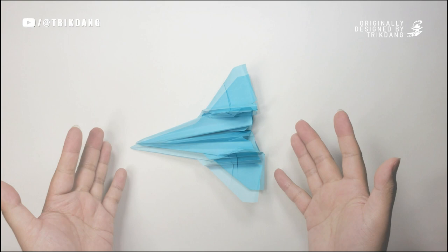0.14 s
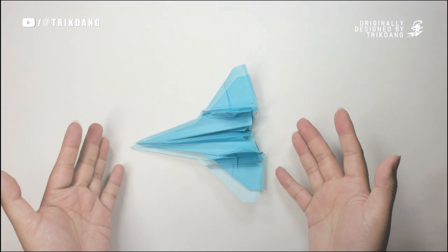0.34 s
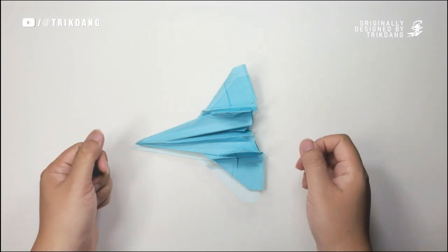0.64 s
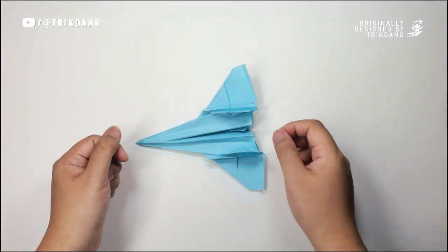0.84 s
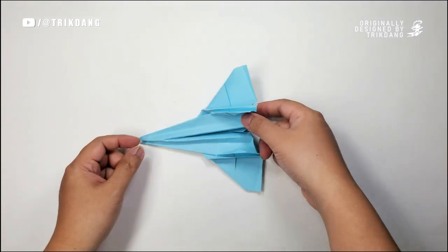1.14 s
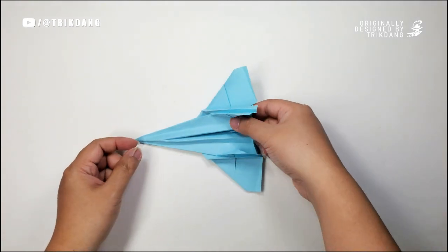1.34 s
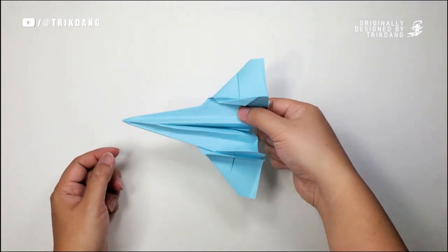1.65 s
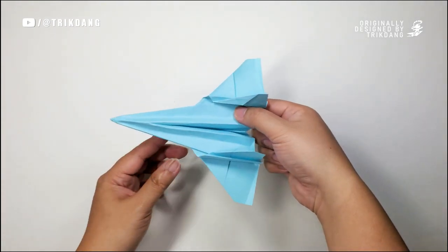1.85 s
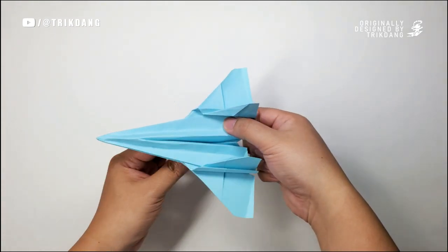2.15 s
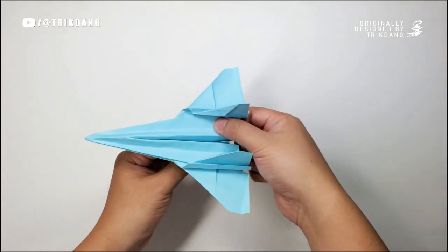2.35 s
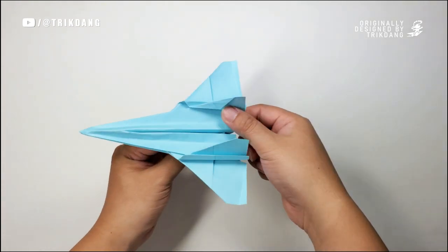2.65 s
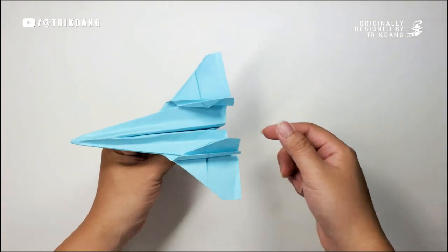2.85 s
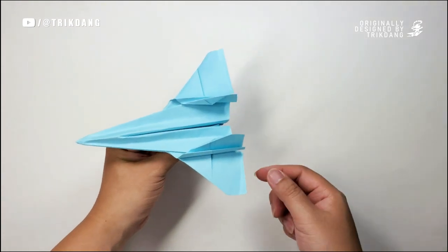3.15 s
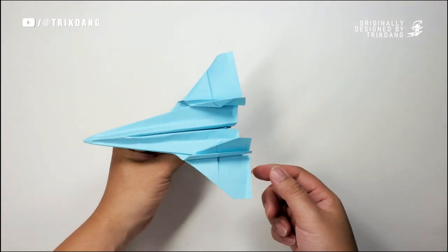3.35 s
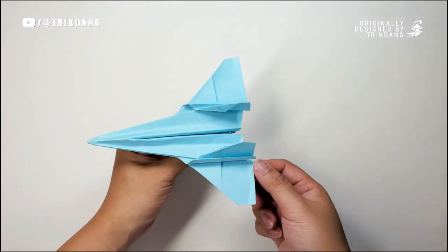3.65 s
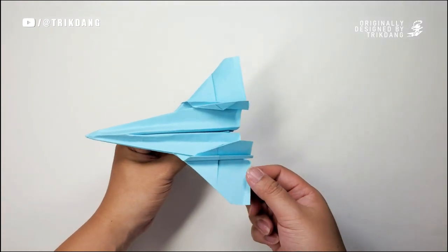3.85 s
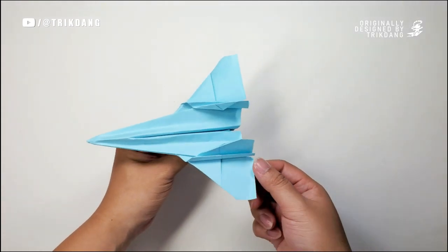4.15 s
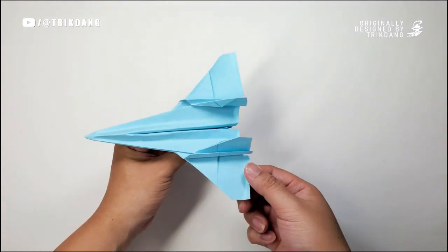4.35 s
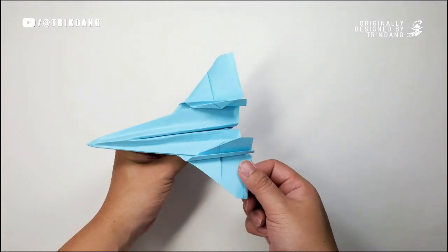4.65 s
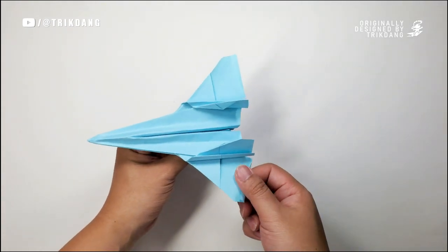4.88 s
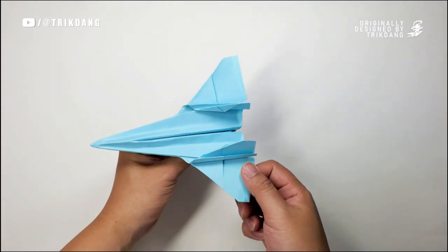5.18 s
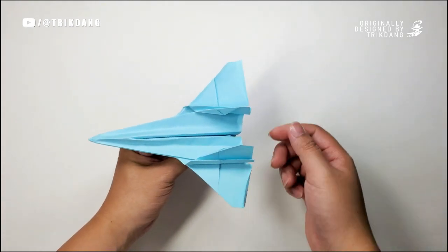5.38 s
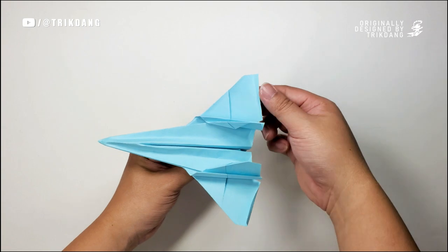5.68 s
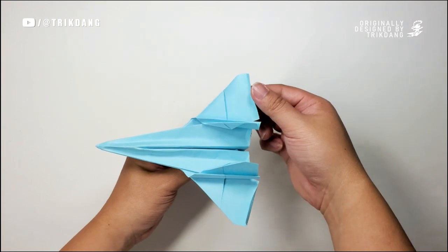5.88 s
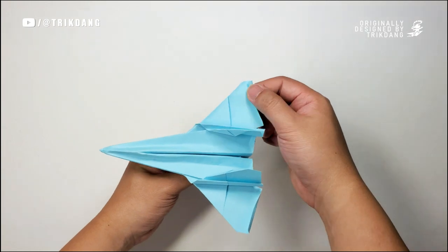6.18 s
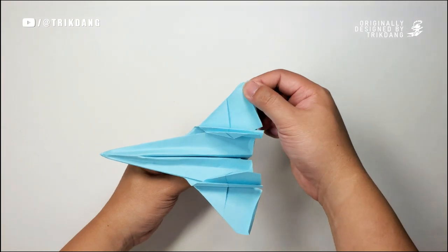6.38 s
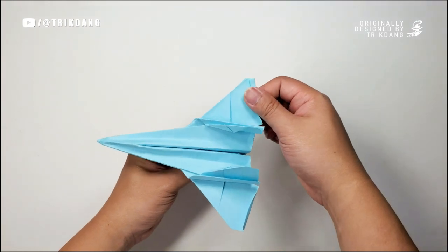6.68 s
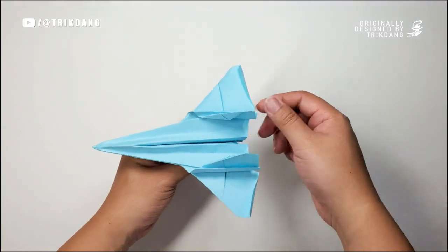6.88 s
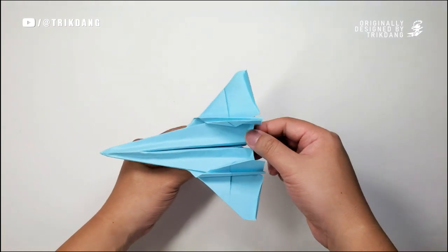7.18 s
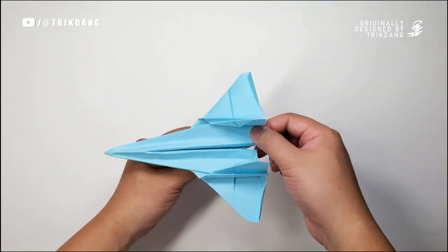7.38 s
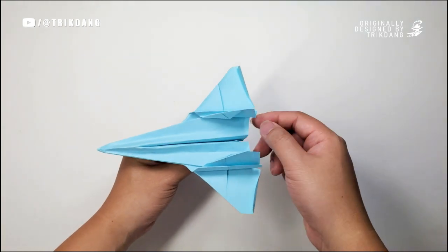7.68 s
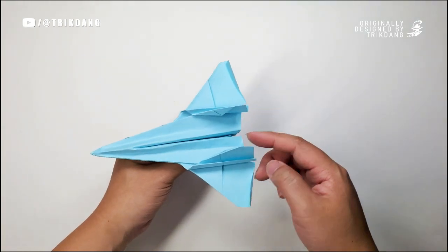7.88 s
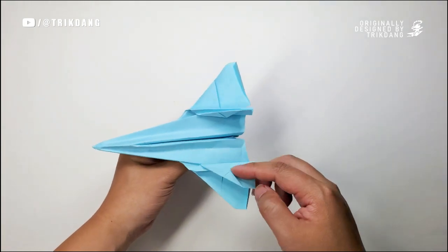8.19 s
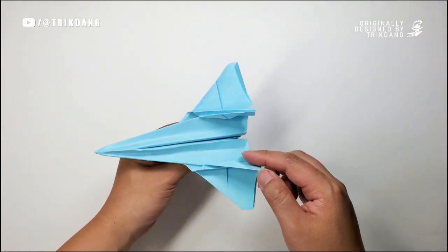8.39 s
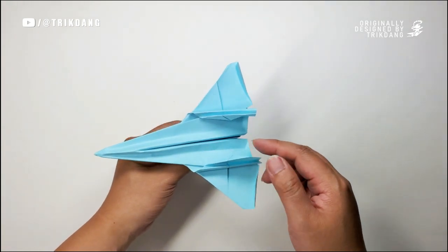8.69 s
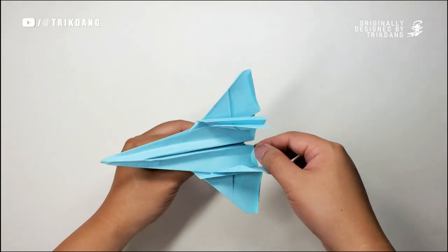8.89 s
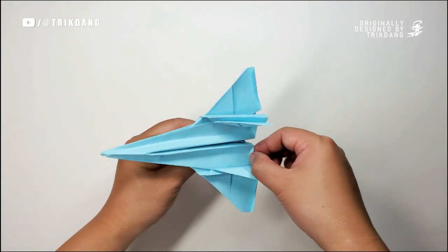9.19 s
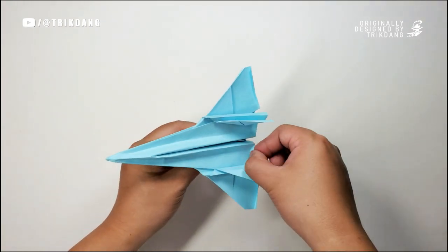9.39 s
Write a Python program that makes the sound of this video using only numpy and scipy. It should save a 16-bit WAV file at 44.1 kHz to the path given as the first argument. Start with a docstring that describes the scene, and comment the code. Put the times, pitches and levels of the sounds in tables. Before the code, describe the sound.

A stiff folded paper model is lifted and adjusted by fingertips over a table. A single bright snap near the beginning towers over everything else; afterwards there are airy rubbing strokes, crisp crinkles, small ticks and occasional dull panel pops, separated by short pauses. Beneath lies a constant deep hum with faint overtones and air noise. The microphone is near, the room small and fairly dry.

```python
"""A room with a table: fingertips slide along the folds of a paper model held above the top.
Stick-slip clicks drive resonances of the sheet; creases snap as short rings with cracks, panels pop lower.
The table top and the room return the paper's sound. A small motor hums as a comb of sine overtones
over ventilation noise, shaped by frequency. The sound fades up at first."""
import sys
import numpy as np
from scipy import signal
from scipy.fft import rfft, irfft, next_fast_len
from scipy.io import wavfile
from scipy.ndimage import uniform_filter1d

SR = 44100
rng = np.random.default_rng(int(sys.argv[2]) if len(sys.argv) > 2 else 0)


def store_pcm(level_fs):
    """Save levels as 16-bit WAV."""
    pcm = np.round(np.clip(level_fs, -1, 1) * 32767).astype(np.int16)
    wavfile.write(sys.argv[1], SR, np.atleast_2d(pcm).T)


N = 420273

# sheet resonances: f/Hz, width of one stage/Hz, relative level/dB
POCKET_MODES = [(2100, 820, -3), (2719, 373, 0), (3330, 1200, -8.5), (4154, 880, -4.5)]
HISS_MODES = [(4650, 1300, -0.5), (5860, 920, -1.5), (6410, 1300, -2), (7750, 1500, 1.5), (9204, 1500, -8)]
SHEEN_MODES = [(10410, 2900, 5), (13550, 8200, -0.5), (17300, 1400, 3.5)]
FLEX_MODES = [(640, 164.3, 10), (760, 181, -2), (1170, 340, 4), (1451, 364, -4)]
# creases snapping: t/s, peak before room/dB, ring f/Hz, crack above ring/dB, crack tilt/(dB/octave), left-right/dB
SNAP_EVENTS = [(1.267, -46.5, 1960, -18, -11, 4), (1.634, -54, 2700, 2, -7, -9),
               (1.6662, -15, 2370, -7, -4.5, 0), (2.215, -55, 2670, 1.5, -1, -2),
               (2.611, -41.5, 2500, -6.5, -10, 1), (2.798, -60, 2820, -4, -11, -5),
               (3.036, -59.5, 2950, -8, -16, -3), (3.8745, -63, 2250, -8, -15, 0),
               (3.886, -61, 2370, 10, -2, -11), (4.245, -51.5, 2330, 1.5, -10, 1),
               (4.483, -50, 4300, 3, -3, -9), (4.512, -62, 2600, 12, -2, -6),
               (4.5224, -56, 2100, -1, -4, -2), (4.538, -61, 2200, 20, 2, -2),
               (4.579, -67, 2700, 16, -4, -4), (4.854, -65, 2440, 9, 0, 0),
               (5.022, -47, 2950, 8.5, -11, -1), (5.0535, -61.5, 2530, 13.5, -2, -1),
               (5.4225, -50, 3200, -4, -2, -1), (5.4322, -33.5, 2555, -6.5, -9, -1),
               (6.0982, -39, 4030, 0.5, -16, -2), (6.147, -56, 2850, -7, -11, -4),
               (6.1822, -42, 4130, 0, -20, -1), (6.4856, -56, 2880, 5, -21, -1),
               (6.6042, -42, 4150, 1.5, -21, -2), (6.742, -52, 2900, -10, -11, 0),
               (6.981, -52, 2550, -10, -12, 2), (7.0402, -58.5, 2420, 3, -12, 2),
               (7.17, -52, 2970, 7.5, -18.5, -2), (7.354, -46, 2450, -1.5, -16, 5),
               (7.898, -47, 2900, 1, -10.5, -1), (7.9254, -48, 3020, 5, -15, 2),
               (8.209, -56, 2100, -5, -16, -1), (8.4636, -31.5, 3620, 4, -14, -3),
               (9.315, -53, 3700, 5.5, -20.5, 0), (9.443, -59, 2500, -8, -12, 6)]


def from_db(db):
    """Decibels to gain."""
    return 10 ** (np.asarray(db) / 20)


def rms_one(x):
    """Scale to rms 1."""
    return x / np.sqrt(np.mean(x ** 2) + 1e-20)


def at_hz(points, hz):
    """Read a spectrum on a log-frequency axis."""
    point_hz, values = np.array(points).T
    return np.interp(np.log(hz), np.log(point_hz), values)


def sides(pan_db):
    """Left and right gains of constant power."""
    gains = from_db(np.array([[.5], [-.5]]) * pan_db)
    return gains / np.sqrt(np.mean(gains ** 2, axis=0))


def wobble(spread_db, corner_hz):
    """Slowly wandering gain: noise at every 100th sample through a double one-pole low-pass, read as dB."""
    r = np.exp(-200 * np.pi * corner_hz / SR)
    noise = rng.standard_normal(N // 100 + 402)
    slow = signal.lfilter([1], [1, -2 * r, r * r], noise)[400:]     # drop the filter's start
    return np.interp(np.arange(N) / 100, np.arange(len(slow)), from_db(spread_db * rms_one(slow)))


def resonate(x, modes, patchy_db=0, centre_hz=None):
    """Parallel two-stage resonances of alternating sign, optionally swelling or favouring a centre; rms 1."""
    favour_db_per_octave2 = 16.5
    out, total = 0, 0
    for k, (hz, width_hz, level_db) in enumerate(modes):
        r = np.exp(-np.pi * width_hz / SR)
        stage = [(1 - r * r) / 2, 0, (r * r - 1) / 2, 1, -2 * r * np.cos(2 * np.pi * hz / SR), r * r]
        swell = wobble(patchy_db, corner_hz=13.6) if patchy_db else 1
        drop_db = 0 if centre_hz is None else favour_db_per_octave2 * np.log2(hz / centre_hz) ** 2
        gain = from_db(level_db - drop_db)
        ringing = signal.sosfilt([stage, stage], x + 1e-18)
        out = out + (-1) ** k * gain * swell * ringing
        total = total + width_hz * gain ** 2
    return rms_one(out / np.sqrt(total))


def motor():
    """Overtones of the shaft rate, high ones wavering more; standing waves give each its side and lead."""
    shaft_hz = 58.865
    # multiple of shaft rate, rms before fade/dB, left-right/dB, left lead/rad
    overtones = [(1, -49.9, -2.4, -0.3), (2, -82, 0, -0.1), (3, -88, -2, -0.6), (5, -80, -1, -0.5),
                 (6, -84, 0, -0.5), (10, -78, 4, 2.6), (11, -87, -5, -1.6), (13, -94, -6, 2.8),
                 (14, -95, 1, 3.1), (22, -92, -1, -2.9), (23, -83, 0, 2.6), (24, -86, 3, -2.6),
                 (32, -95, -7, -1.7), (33, -92, -3, 2.0), (34, -94, -11, 1.9), (38, -90, 0, -2.8),
                 (39, -85, 7, -3.0), (40, -82, -11, -3.1), (41, -91, -1, 0.7), (42, -87, 2, -0.5),
                 (45, -87, -16, -0.8), (46, -83, 4, 2.8), (48, -91, -5, -0.0), (51, -92, -3, -0.3),
                 (52, -95, -7, -1.1), (53, -94, -6, 1.9), (78, -94, -9, -2.5)]
    turn, out = 2 * np.pi * shaft_hz * np.arange(N) / SR, np.zeros((2, N))
    for multiple, level_db, pan_db, lead_rad in overtones:
        phase = multiple * turn + rng.uniform(0, 2 * np.pi) + np.array([[lead_rad], [0]])
        waver = wobble(0.081 + .5 * np.log(multiple), corner_hz=3.8)
        out += np.sqrt(2) * from_db(level_db) * waver * sides(pan_db) * np.sin(phase)
    return out


def air():
    """Ventilation noise with resonances, its likeness and lean between the ears set per frequency."""
    level_db, rumble_hz = -65.5, 250
    # noise spectrum: f/Hz, relative density/dB
    spectrum = [(30, -28), (72, -26.5), (100, -24.5), (174, -38), (330, -38), (420, -42.5), (610, -44),
                (900, -47), (1350, -55), (1700, -54), (2550, -50), (4200, -56), (8500, -67), (15500, -59)]
    # left-right likeness: f/Hz, correlation (-1 to 1)
    likeness = [(60, 0.72), (150, 0.934), (380, 0.025), (950, -0.44), (2380, -0.25), (5980, -0.12),
                (15000, -0.065)]
    # side balance: f/Hz, left-right/dB
    lean = [(60, -2), (150, 1), (380, 1.5), (950, 0.0), (2380, -1.5), (5980, -2.5), (15000, 3)]
    # motor housing and ducts ringing: f/Hz, width/Hz, rise above noise/dB
    housing = [(127.5, 6.8, 10.5), (204, 25, 3), (600, 39, 8.5), (1340, 220, 12.5), (1960, 120, 3.5),
               (2370, 98, 6.5), (2950, 58, 6), (4070, 80, 8), (4405, 106.2, 10), (5430, 200, 9),
               (7670, 142, 9)]
    # gain of the low end: t/s, gain/dB
    rumble = [(0, 0.5), (1.198, 2), (2.401, -1.5), (3.5, -4), (5.5, -5.5), (9.53, -4.5)]
    size = next_fast_len(N)
    hz = np.maximum(np.arange(size // 2 + 1) * SR / size, 20)
    mid, side = rfft(rng.standard_normal((2, size)))
    alike = np.clip(at_hz(likeness, hz), -1, 1)
    pair = np.sqrt(1 + alike) * mid + np.sqrt(1 - alike) * side * [[1], [-1]]
    peaks_db = sum(rise_db / (1 + (2 * (hz - peak_hz) / width_hz) ** 2)
                   for peak_hz, width_hz, rise_db in housing)
    pair = pair * from_db(at_hz(spectrum, hz) + peaks_db) * sides(at_hz(lean, hz))
    full = irfft(pair, size)[:, :N]
    low = irfft(pair / (1 + (hz / rumble_hz) ** 4), size)[:, :N]
    extra = from_db(np.interp(np.arange(N) / SR, *np.transpose(rumble))) - 1
    return from_db(level_db) * rms_one(full + extra * low)


def pressure():
    """Gains of hiss, pocket, flex, sheen and centres of pocket, hiss, sheen.

    Each stroke rises, holds and falls; after each snap the settling sheet leaves a dying rustle."""
    # finger strokes: full pressure t/s, rise/s, hold/s, fall/s (rise and fall per 20 dB), hiss before room/dB,
    # pocket, flex, sheen above hiss/dB, centres of pocket, hiss, sheen f/Hz
    finger_strokes = [(0.77, 0.057, 0.05, 0.1, -86, 0, 6.5, 0, 2510, 6220.0, 14500.0),
                      (1.27, 0.029, 0.032, 0.04, -83.5, 14.5, 3.0, 1, 2117, 5650, 12800.0),
                      (1.334, 0.03, 0.039, 0.07, -70, 1.5, -8, -8, 2675, 5520, 14200),
                      (1.525, 0.016, 0.03, 0.094, -76.5, 1.5, -10, 0, 2760.0, 5750, 13150),
                      (1.636, 0.045, 0.034, 0.026, -62.5, 3.5, -8, -5.5, 3070.0, 5470, 13250),
                      (1.76, 0.11, 0.036, 0.19, -77.5, 3, -5, -3, 2430, 6180.0, 13060),
                      (1.96, 0.077, 0.016, 0.028, -71.5, -6, -9, -10, 2990.0, 6260, 12600.0),
                      (2.218, 0.0045, 0.031, 0.074, -72.5, -4, -8, -10, 2730, 6140.0, 12600.0),
                      (2.42, 0.16, 0.076, 0.1, -65, 0, -8.5, -7, 2720, 6500, 11900.0),
                      (2.53, 0.06, 0.065, 0.025, -67, 3, -7, -5, 2830, 5810, 14130),
                      (2.685, 0.033, 0.027, 0.094, -70.5, 2.5, -5.0, -8, 3685, 4850, 13290),
                      (2.825, 0.054, 0.045, 0.08, -61, -1, -13, -4.5, 2820, 5020, 14000.0),
                      (2.9, 0.057, 0.038, 0.037, -64, -1.5, -23, 1.5, 3300, 5770, 13650),
                      (2.95, 0.034, 0.018, 0.03, -62.5, -0.5, -6, -13, 3480.0, 5060, 13900.0),
                      (3.04, 0.03, 0.05, 0.099, -85, 5.5, 3, -15, 2944, 4970.0, 14500.0),
                      (3.82, 0.02, 0.073, 0.027, -73, -10, -22, -12, 2150.0, 6500.0, 10800.0),
                      (3.958, 0.011, 0.073, 0.09, -59, -6.5, -14.5, -2.5, 3200, 7130, 12120),
                      (4.11, 0.069, 0.044, 0.044, -64, -3.5, -15.5, -8.0, 2600, 7650, 11010),
                      (4.25, 0.01, 0.08, 0.034, -83.0, -4, -3, 1.5, 2200, 6450, 13100.0),
                      (4.478, 0.011, 0.026, 0.02, -53, -7.5, -18.5, -5, 3770, 8100, 10820),
                      (4.522, 0.007, 0.008, 0.012, -53, -12, -24, -7, 2600, 7000, 10800.0),
                      (4.58, 0.028, 0.017, 0.044, -72, -16, -13, -4, 3400.0, 7000, 11300.0),
                      (4.665, 0.1, 0.027, 0.078, -68.5, -4, -25, -4, 2998, 7100, 11700.0),
                      (4.779, 0.054, 0.013, 0.03, -72, -9, -25, -7.5, 3910.0, 5840, 12300.0),
                      (4.855, 0.0096, 0.0081, 0.033, -69, -5, -14, 0, 3690.0, 6680.0, 10390),
                      (4.92, 0.11, 0.043, 0.032, -70, -9, -16, -3.5, 3660, 6750, 11510),
                      (5.0, 0.022, 0.021, 0.03, -64.5, -6, -19, -9, 3720, 7510.0, 11200.0),
                      (5.235, 0.012, 0.013, 0.076, -70, -2, -16, -1, 2670, 7180, 11000.0),
                      (5.414, 0.01, 0.018, 0.042, -59, -10, -15, -2.5, 3270, 6770, 12130),
                      (6.146, 0.0069, 0.037, 0.055, -68, -2, -7.5, -6, 3036, 6740.0, 12900.0),
                      (6.392, 0.016, 0.042, 0.039, -58.5, -3.0, -11, 2, 2910, 7200, 13050),
                      (6.689, 0.03, 0.035, 0.063, -60.5, -7.5, -17, -3.0, 3440.0, 7430, 12300.0),
                      (6.775, 0.04, 0.028, 0.025, -65, -6.5, -26, -4, 2702, 7240, 12300.0),
                      (6.955, 0.013, 0.028, 0.024, -67.5, -3, -12.0, -2.5, 2586, 7300.0, 12630),
                      (7.329, 0.0038, 0.028, 0.14, -68, 6.5, -2, -12, 2490, 6150, 12100.0),
                      (7.385, 0.068, 0.023, 0.11, -68, -8, -26, -9, 2400, 7500, 11500.0),
                      (7.56, 0.047, 0.03, 0.045, -66.5, -0.5, -12.5, -1.5, 3810, 5930.0, 10900.0),
                      (7.875, 0.024, 0.04, 0.022, -63, -4, -10, -8.5, 2950, 7800, 11820),
                      (8.163, 0.015, 0.034, 0.04, -70.5, 0.5, -7, 0.5, 2460.0, 5800.0, 12950),
                      (8.225, 0.03, 0.018, 0.024, -64, -3, -13, -0.5, 3280, 6260, 14090),
                      (8.288, 0.02, 0.018, 0.14, -70, -9.0, -18, 2, 3340.0, 6660, 13720),
                      (8.4, 0.041, 0.027, 0.025, -66, -13, -11.5, -6, 3815, 7970.0, 12710),
                      (8.575, 0.033, 0.023, 0.07, -68.5, -11, -24, -0.5, 3580, 6740, 13120),
                      (8.716, 0.013, 0.008, 0.043, -70, -5, -12, -10, 2130.0, 7610.0, 11820),
                      (8.787, 0.028, 0.012, 0.068, -69.5, -1.5, 1.5, -4, 2710, 7730.0, 11300.0),
                      (8.875, 0.02, 0.011, 0.017, -66, -1, -8, -7, 2220, 7470, 10790),
                      (9.12, 0.015, 0.037, 0.087, -76.5, -2, -9, -0.5, 2980.0, 6020, 14600),
                      (9.222, 0.021, 0.011, 0.046, -66.5, -3.5, -2, -3, 2590.0, 7060.0, 11300.0),
                      (9.285, 0.047, 0.017, 0.05, -69.5, -0.5, -0.5, -0.5, 3296, 7480, 11220),
                      (9.4, 0.11, 0.045, 0.11, -76.5, 2.5, 3, -3, 3360, 5660.0, 10720),
                      (9.5, 0.05, 0.03, 0.05, -85.5, 8, 3, -1, 3100.0, 5510.0, 13300.0)]
    # rustle: pocket, flex, sheen above hiss/dB
    settle_colour_db = [1, -14, -19]
    # centres with no finger pressing: pocket, hiss, sheen f/Hz
    settle_centres_hz = [3000, 6500, 12300]
    # hiss after a 0 dB snap, dB of hiss per dB of snap, decay
    settle_db, settle_follows, settle_db_per_s = -39.5, 0.69, 351
    t, power = np.arange(N) / SR, np.zeros((4, N))
    weight = np.full(N, 1e-10)
    centres = weight * np.array(settle_centres_hz)[:, None]
    for s, rise_s, hold_s, fall_s, hiss_db, pocket_db, flex_db, sheen_db, *centres_hz in finger_strokes:
        start = max(round((s - 2 * rise_s) * SR), 0)
        on = slice(start, round((s + hold_s + 2 * fall_s) * SR))
        off_hold = np.maximum((s - t[on]) / rise_s, (t[on] - s - hold_s) / fall_s)
        stroke = from_db(hiss_db - 20 * np.maximum(off_hold, 0)) ** 2
        power[:, on] += stroke * from_db([[0], [pocket_db], [flex_db], [sheen_db]]) ** 2
        weight[on] += stroke
        centres[:, on] += stroke * np.array(centres_hz)[:, None]
    for s, peak_db, *_ in SNAP_EVENTS:
        on = slice(round(s * SR), round(s * SR) + SR // 5)
        level_db = settle_db + settle_follows * peak_db - settle_db_per_s * (t[on] - s)
        power[:, on] += from_db(level_db + np.array([0] + settle_colour_db)[:, None]) ** 2
    return np.sqrt(power), centres / weight


def strokes(slips_per_s, spread_db, shared, clump_db):
    """Skin sticks and slips on paper fibres: dense clicks into the sheet's resonances, in clumps of level."""
    slips = (rng.random((3, N)) < slips_per_s / SR) * rng.choice([-1, 1], (3, N))
    slips = slips * from_db(spread_db * np.minimum(rng.exponential(1, (3, N)), 3.5))
    gains, (pocket_hz, hiss_hz, sheen_hz) = pressure()
    gains = uniform_filter1d(gains, size=66) * wobble(clump_db, corner_hz=120.0)
    bands = [HISS_MODES, POCKET_MODES, FLEX_MODES, SHEEN_MODES]
    centres = [hiss_hz, pocket_hz, None, sheen_hz]
    out = 0
    for gain, modes, centre_hz, share in zip(gains, bands, centres, np.clip(shared, 0, 1)):
        # each ear faces other parts of the sheet
        pair = np.sqrt(share) * slips[0] + np.sqrt(1 - share) * slips[1:]
        out = out + gain * resonate(pair, modes, patchy_db=1.7, centre_hz=centre_hz)
    return out * sides(-0.76)


def burst(hz, t60_s):
    """A buckling panel: a ring that swells smoothly and dies, so little spills far from its pitch; peak 1."""
    t = np.arange(SR // 10) / SR
    ring = 1e-18 + t * from_db(-60 * t / max(t60_s, .002)) * np.sin(2 * np.pi * hz * t)
    # a small free sheet radiates little bass
    ring = signal.sosfilt(signal.butter(4, 0.5 * hz, "high", fs=SR, output="sos"), ring)
    return ring / np.max(np.abs(ring))


def crack(hz, tilt_db, chance):
    """One clean break and smaller ones within 2 ms excite the sheet, fading below the ring; peak 1."""
    breaks = np.zeros((2, SR // 10))
    breaks[:, :88] = chance * from_db(-11.0 - 60 * np.arange(88) / SR / 0.0054)    # t60 5.4 ms
    breaks[:, 0] = 1
    modes = []
    for mode_hz, width_hz, level_db in POCKET_MODES + HISS_MODES + SHEEN_MODES:
        slope_db = tilt_db if mode_hz > hz else 24      # per octave
        modes.append((mode_hz, 0.76 * width_hz, level_db + slope_db * np.log2(mode_hz / hz)))
    sound = resonate(breaks, modes)
    return sound / np.max(np.abs(sound))


def snaps():
    """Each crease gives a short ring and a crack; panels pop lower, shaking the flex resonances too."""
    # panels popping in or out: t/s, ring peak before room/dB, ring f/Hz, shake above ring/dB
    pops = [(2.215, -66, 494, 10), (2.521, -62, 1165, 0), (2.894, -58.5, 710, -3), (3.882, -58.5, 450, -14),
            (4.0155, -60, 1140, -10), (4.243, -55, 446, -3), (5.431, -60.5, 577, 2.5),
            (6.747, -63, 680, -5), (6.865, -65, 600, -9), (6.982, -48.5, 1116, -12),
            (6.986, -49.5, 620, -18), (7.334, -70, 1320, 13), (8.153, -61, 577, -6.5), (8.209, -65, 435, 0)]
    snap_t60_cycles, pop_t60_cycles, left_lead_samples = 6.0, 9.7, 1
    out, size = np.zeros((2, N + SR)), SR // 10
    chance = rng.standard_normal((len(SNAP_EVENTS), 3, 88))
    for (s, peak_db, hz, crack_db, tilt_db, pan_db), c in zip(SNAP_EVENTS, chance):
        breaks = c[0] + c[1:] / 2       # common part plus one per ear
        sound = burst(hz, snap_t60_cycles / hz) + from_db(crack_db) * crack(hz, tilt_db, breaks)
        sound[1] = np.roll(sound[1], left_lead_samples)
        start = round(s * SR)
        out[:, start:start + size] += from_db(peak_db) * sides(pan_db) * sound
    shake = resonate(np.arange(size) == 0, FLEX_MODES)
    shake = shake / np.max(np.abs(shake))
    for s, peak_db, hz, shake_db in pops:
        sound = burst(hz, pop_t60_cycles / hz) + from_db(shake_db) * shake
        start = round(s * SR)
        out[:, start:start + size] += from_db(peak_db) * sound
    return out[:, :N]


def bounce(x):
    """The table top returns the paper's sound after twice its height, with little bass: a comb."""
    # touched spot over the table: t/s, height/cm
    height = [(1.3, 17), (1.67, 13.7), (2.4, 12.8), (2.9, 14), (4.0, 16.8), (5.43, 16.5), (6.1, 13.7),
              (6.4, 15.5), (6.6, 13.2), (7.17, 17.8), (7.35, 13.2), (7.9, 12), (8.46, 12.3), (9.3, 14.4)]
    bounce_db, bass_cut_hz, sound_m_per_s = -6.5, 800, 343
    n = np.arange(N)
    height_m = np.interp(n / SR, *np.transpose(height)) / 100
    late = n - 2 * height_m / sound_m_per_s * SR
    thin = signal.sosfilt(signal.butter(1, bass_cut_hz, "high", fs=SR, output="sos"), x)
    return x + from_db(bounce_db) * np.array([np.interp(late, n, v) for v in thin])


def room(x):
    """Scattered echoes off table and hands from 3 ms, then a dull diffuse tail; unlike in each ear."""
    echo_db, echo_t60_s, tail_db, tail_t60_s = -10, 0.064, -21, 0.28    # before the dulling low-pass
    t = np.arange(SR // 3) / SR
    echoes = (rng.random((2, len(t))) < 1500 / SR) * rng.standard_normal((2, len(t))) * (t > .003)
    echoes = from_db(echo_db - 60 * t / echo_t60_s) * echoes
    tail = rng.standard_normal((2, len(t))) * from_db(-60 * t / tail_t60_s) * (t > .008)
    tail = from_db(tail_db) * tail / np.sqrt(np.sum(tail ** 2) / 2)
    walls = signal.lfilter([.5], [1, -.55], echoes + tail)
    return x + signal.fftconvolve(x, walls, axes=1)[:, :N]


def scene():
    """Paper in the room, over motor and air."""
    left_lead_samples = 2
    # shared: part of the clicks' power common to both ears, for hiss, pocket, flex, sheen
    rubbing = strokes(slips_per_s=6000, spread_db=2.5, shared=[0.24, 0.58, 0.56, 0.092], clump_db=1.84)
    rubbing[1] = np.roll(rubbing[1], left_lead_samples)
    paper = room(bounce(rubbing + snaps()))
    return paper + motor() + air()


def record(dry):
    """The level fades up; a steep low-pass cuts the top."""
    # t/s, gain/dB
    fade_up = [(0, -3.5), (.5, -2), (1.15, 0.5)]
    cutoff_hz = 15800
    fade = from_db(np.interp(np.arange(N) / SR, *np.transpose(fade_up)))
    return signal.sosfilt(signal.ellip(12, .5, 70, cutoff_hz, fs=SR, output="sos"), dry * fade)


dry = scene()
out = record(dry)
store_pcm(out)
```